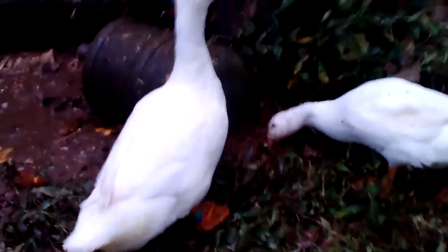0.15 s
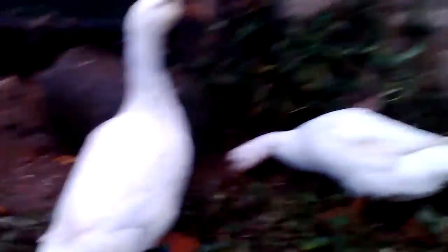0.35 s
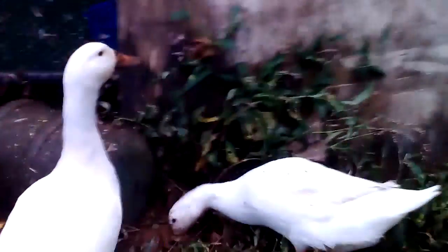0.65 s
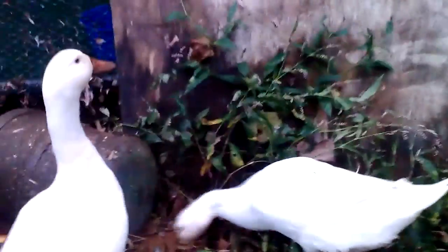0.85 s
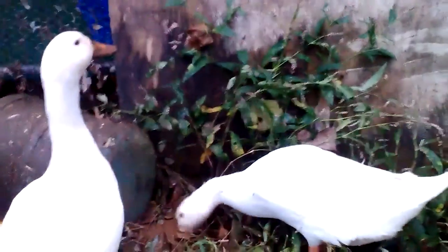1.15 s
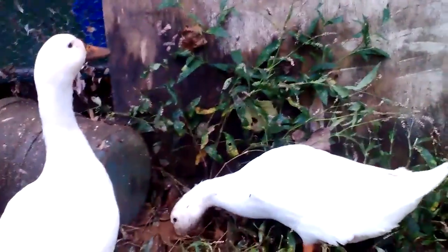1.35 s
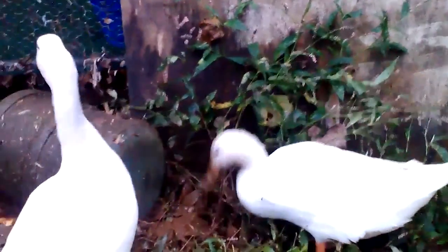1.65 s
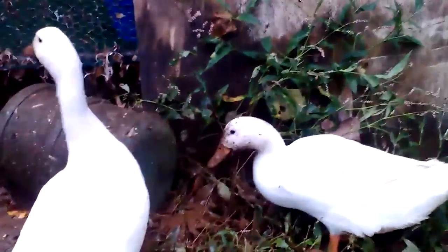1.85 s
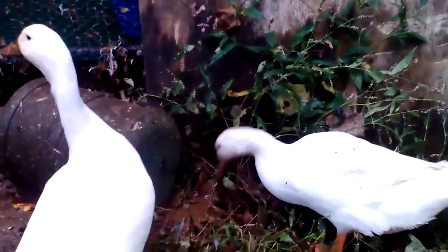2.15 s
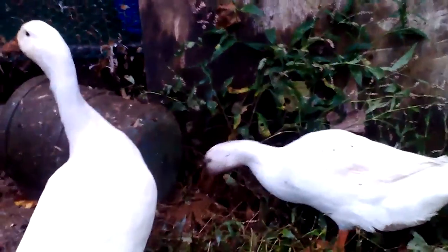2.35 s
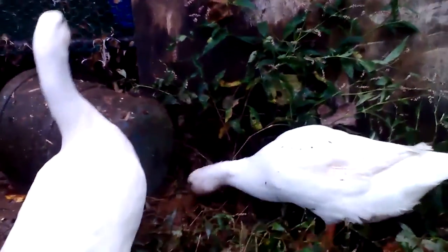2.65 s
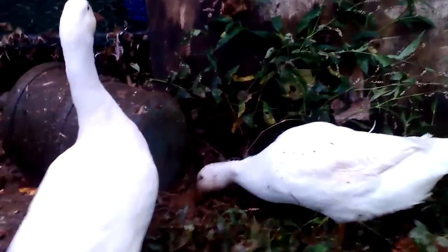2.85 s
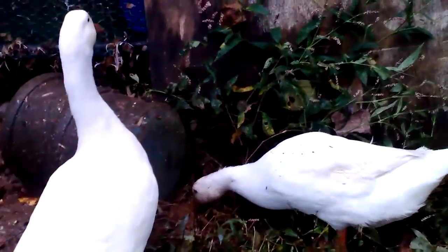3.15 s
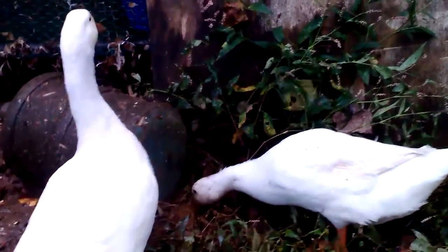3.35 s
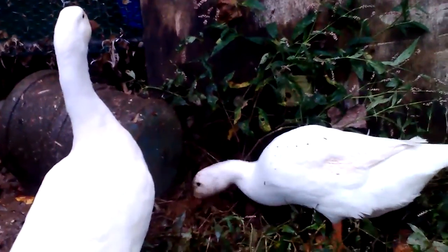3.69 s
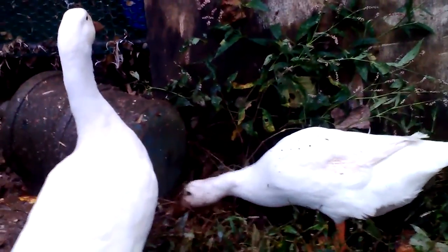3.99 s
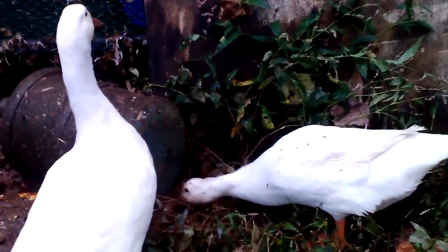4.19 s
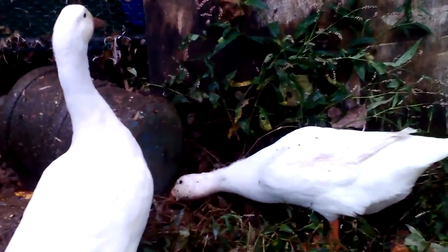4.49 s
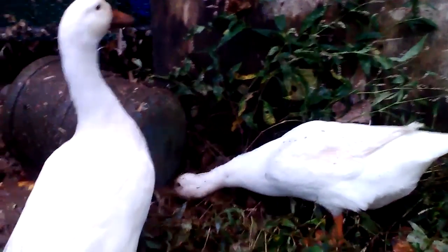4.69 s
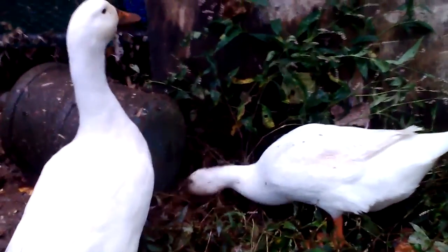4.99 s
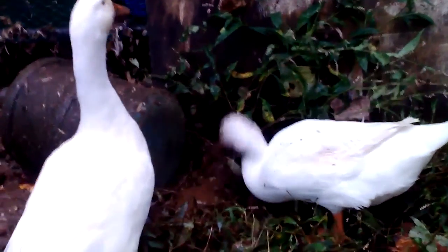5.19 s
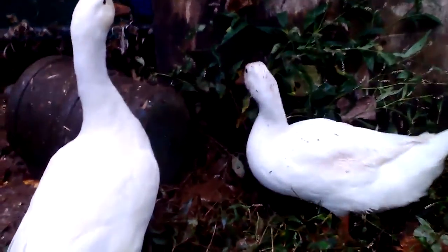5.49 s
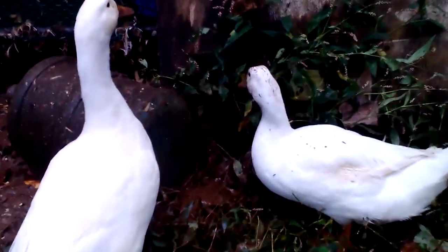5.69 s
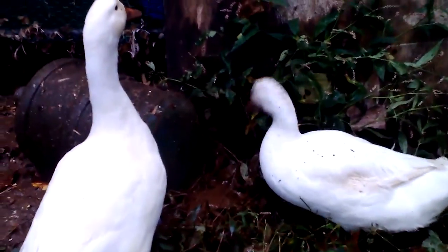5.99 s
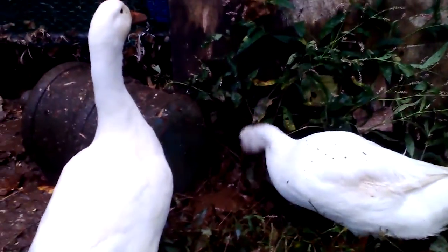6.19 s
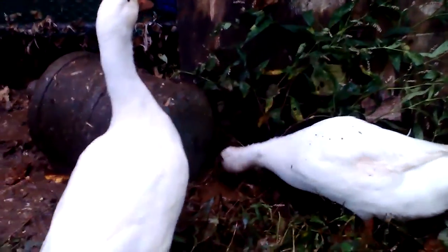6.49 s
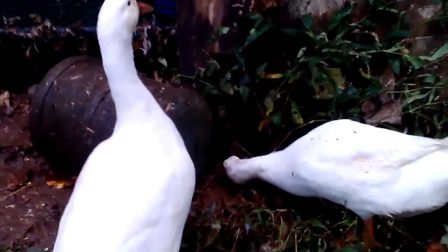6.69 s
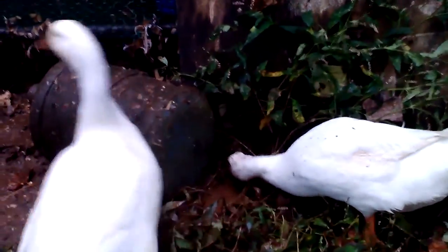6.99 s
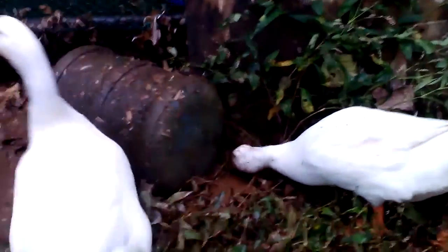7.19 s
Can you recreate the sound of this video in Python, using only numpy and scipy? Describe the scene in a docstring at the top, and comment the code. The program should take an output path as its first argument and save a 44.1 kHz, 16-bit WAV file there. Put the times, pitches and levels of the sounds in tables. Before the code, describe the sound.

Two domestic ducks are heard close up in a yard, in mono, over a steady hiss. Short, soft, high trilled clucks repeat throughout, about two or three a second, unevenly spaced. For the first 1.4 seconds one duck feeds, with tiny wet ticks and sharp crackles of stems and grit. The feeding returns from about 2.7 to 5 seconds, with a rapid squelching run of the bill in mud around 4.4 seconds and four quick bill claps just after. From 6.4 seconds the nibbling resumes, and between 6.7 and 7.3 seconds come four quick hoarse quacks, growing louder, with one sharp bill clap at 6.9 seconds and a last cluck. In the background a faint distant motor hums and changes speed, most noticeable around 1 second. A few faint falling whistles sound far off between 5 and 6.7 seconds. Nearby surfaces add a slight, short echo.

```python
"""Soft trilled clucks over a steady hiss: two domestic ducks in a yard, close up, in mono.
Each cluck is a train of swept peeps from the syrinx. One duck dabbles, its bill smacking in wet mud.
At the end one breaks into hoarse quacks, pulses and chopped air ringing the open throat.
A barrel and a wall answer them. Behind are a far motor that changes speed and a few faint whistles."""
import sys
import numpy as np
from scipy import signal
from scipy.fft import rfft, irfft, next_fast_len
from scipy.io import wavfile
from scipy.ndimage import map_coordinates

SR = 44100
rng = np.random.default_rng(int(sys.argv[2]) if len(sys.argv) > 2 else 0)


def persist_wave(psi):
    """Save psi, clipped to +-1, as 16-bit WAV."""
    counts = np.round(np.clip(psi, -1, 1) * 32767).astype(np.int16)
    wavfile.write(sys.argv[1], SR, np.atleast_2d(counts).T)


N = 323680


def amp(db):
    return 10 ** (np.asarray(db) / 20)


def unit_rms(x):
    return x / np.sqrt(np.mean(x ** 2) + 1e-20)


def clock(length_s):
    return np.arange(int(length_s * SR)) / SR


def sine(pitch_hz):
    return np.sin(2 * np.pi * np.cumsum(pitch_hz) / SR)


def curve_at(points, hz):
    """Interpolate (freq_hz, value) points on a log frequency axis."""
    freqs_hz, values = np.transpose(points)
    return np.interp(np.log(hz + 1), np.log(freqs_hz + 1), values)


def add(track, start_s, x):
    i = max(round(start_s * SR), 0)
    track[i:i + len(x)] += x[:max(len(track) - i, 0)]


def wobble(rate_hz, n):
    """Smooth random curve, rate_hz knots a second."""
    knots = rng.standard_normal(int(n * rate_hz / SR) + 4)
    return map_coordinates(knots, [np.arange(n) * rate_hz / SR])


def filtered(x, response):
    """Apply a complex frequency response."""
    size = next_fast_len(len(x) + SR // 10)
    return irfft(rfft(x, size) * response(np.fft.rfftfreq(size, 1 / SR)), size)[:len(x)]


def noise(spectrum, n):
    """Coloured noise, rms 1."""
    return unit_rms(filtered(rng.standard_normal(n), lambda f: amp(curve_at(spectrum, f))))


def resonance(f, centre_hz, width_hz):
    return 1j * f * width_hz / (centre_hz ** 2 - f ** 2 + 1j * f * width_hz)


def cavity(modes, f):
    """Response of parallel resonances, alternating in sign."""
    return sum((-1) ** k * amp(db) * resonance(f, hz, width_hz)
               for k, (hz, width_hz, db) in enumerate(modes))


def snap(centre_hz, spray_s, width_ratio, grit, order=2):
    """A contact and a brief spray of smaller ones through a broad resonance; peak 1."""
    t = clock(0.06)
    age = 2 * t / spray_s
    force = grit * rng.standard_normal(len(t)) ** 3 * np.sqrt(age) * np.exp(-age)
    force[0] += 1
    ring = filtered(force, lambda f: resonance(f, centre_hz, width_ratio * centre_hz) ** order)
    return ring / np.abs(ring).max()


# outdoor noise spectra: freq_hz, density_db
MURMUR_SPECTRUM = [(76, -30), (130, -2.5), (270, -5.5), (336, -4), (488, -9.5), (562, -0.5), (623, -5.5),
                   (690, -1), (1040, -1), (1250, -1), (2010, 1), (2190, -2.5), (2800, -8), (3640, -46.5),
                   (6160, -120)]
HISS_SPECTRUM = [(2000, -45), (2850, -6), (3200, -0.5), (3700, -0.5), (4500, -3.5), (5100, 2.5),
                 (5800, -0.5), (6500, 2), (7900, -10), (10000, -11)]
RUMBLE_SPECTRUM = [(20, -57), (35, -26), (50, -7.5), (78, 3), (110, 3.5), (160, -15), (300, -51.5)]
def background(murmur_db=-46, hiss_db=-38.5, rumble_db=-60):
    """Even hiss over the gently moving murmur and rumble of the outdoors."""
    murmur = amp(murmur_db + 0.6 * wobble(6, N)) * noise(MURMUR_SPECTRUM, N)
    hiss = amp(hiss_db) * noise(HISS_SPECTRUM, N)
    rumble = amp(rumble_db + 1.7 * wobble(6.1, N)) * noise(RUMBLE_SPECTRUM, N)
    return murmur + hiss + rumble


# engine hum: time_s, pitch_hz, level_db
MOTOR_HUM = [(0, 133, -61), (.55, 130, -62), (0.8, 122, -50), (0.999, 112, -49), (1.42, 93, -56),
             (2.2, 98, -54), (2.8, 105, -55), (3.55, 106, -64.5), (4, 80, -62), (5.1, 83, -61.5),
             (5.5, 86, -56), (7.34, 88, -62.5)]
def motor():
    """The low hum of a far engine slows and picks up again."""
    time_s, pitch_hz, level_db = np.transpose(MOTOR_HUM)
    t = np.arange(N) / SR
    hum = sine(np.interp(t, time_s, pitch_hz) * (1 + 0.01 * wobble(11, N)))
    return amp(np.interp(t, time_s, level_db) + 1.6 * wobble(14, N)) * unit_rms(hum)


# far notes: start_s, length_s, start_hz, level_db
WHISTLE_NOTES = [(5.108, 0.14, 1080, -49), (6.03, 0.085, 1000, -53), (6.232, 0.049, 1084, -40.5),
                 (6.594, 0.072, 815, -43.5)]
def whistles(fall_ratio=0.8):
    """Faint falling notes from far off."""
    out = np.zeros(N)
    for start_s, length_s, start_hz, level_db in WHISTLE_NOTES:
        n = int(length_s * SR)
        pitch_hz = np.geomspace(start_hz, fall_ratio * start_hz, n) * (1 + 0.04 * wobble(160, n))
        envelope = np.hanning(n) ** 0.5 * amp(4.2 * wobble(70, n))
        add(out, start_s, amp(level_db) * unit_rms(envelope * sine(pitch_hz)))
    return out


def far_echo(x, gain_db=-21, t60_s=0.44):
    """A faint tail from across the yard."""
    t = clock(0.6)
    tail = rng.standard_normal(len(t)) * amp(-60 * t / t60_s)
    return amp(gain_db) * signal.fftconvolve(x, tail / np.linalg.norm(tail))[:N]


# barrel and wall decay: freq_hz, t60_s
NEAR_DECAY = [(200, 0.11), (1500, 0.061), (8000, 0.036)]
def near_echoes(x, blocks=28, delay_s=0.002058):
    """Barrel and wall answer differently as the birds move their heads: a new random tail per block."""
    out = np.zeros(N)
    edges = np.linspace(0, N, blocks + 1).astype(int)
    for i, j in zip(edges, edges[1:]):
        hz, t, spectra = signal.stft(rng.standard_normal(SR // 4), SR, nperseg=256)
        decay = amp(-60 * t / curve_at(NEAR_DECAY, hz)[:, None])
        _, tail = signal.istft(spectra * decay, SR, nperseg=256)
        add(out, i / SR + delay_s, signal.fftconvolve(x[i:j], tail / np.linalg.norm(tail)))
    return out


def reflection_comb(f, copies=3, gain=0.26):
    """Ground and barrel send back close copies, which comb each cluck in its own way."""
    delays_s = rng.uniform(0.0015, 0.009, (copies, 1))
    return 1 + gain * np.exp(-2j * np.pi * delays_s * f).sum(0)


# bill on the ground: start_s, end_s
FEEDING_SPANS = [(0, 1.4), (2.7, 5), (6.4, 7.34)]
def nibbles(tick_db=-46, grit_db=-42, spread_db=7, tries=170):
    """Tiny wet ticks and grit at random while the bill is on the ground."""
    out = np.zeros(N)
    for position, size, colour in rng.random((tries, 3)):
        time_s = position * N / SR
        if any(start_s < time_s < end_s for start_s, end_s in FEEDING_SPANS):
            tick = amp(tick_db) * snap(550 * 3 ** colour, spray_s=0.0066, width_ratio=1.1, grit=0.32)
            grit = amp(grit_db) * snap(3400 * 1.71 ** colour, spray_s=0.0043, width_ratio=0.26, grit=0.22)
            add(out, time_s, amp(spread_db * (size + 0.5)) * (tick + grit))
    return out


# stems and grit: start_s, peak_db, centre_hz
STEM_CRACKLES = [(0.2848, -24.5, 4300), (0.4878, -19.5, 4250), (0.591, -20, 3740), (0.6605, -19.5, 5360),
                 (0.7822, -18.5, 5240), (1.1029, -18.5, 5300), (1.1116, -22.5, 3730), (1.1761, -16.5, 4070),
                 (1.3826, -12.5, 4930), (3.048, -24, 5070), (3.208, -22, 4000), (3.3838, -21.5, 5200),
                 (3.5126, -23, 4000), (4.422, -14.5, 5300)]
def crackles():
    """Wet stems and grit crackle."""
    out = np.zeros(N)
    for start_s, peak_db, centre_hz in STEM_CRACKLES:
        crack = snap(centre_hz, spray_s=0.005, width_ratio=0.14, grit=0.4, order=1)
        add(out, start_s, amp(peak_db) * crack)
    return out


# bill claps: start_s, peak_db, centre_hz
BILL_CLAPS = [(0.541, -25.5, 1290), (2.641, -27.5, 1360), (3.127, -27, 1340), (3.206, -26, 1840),
              (4.719, -18, 1500), (4.784, -16, 1410), (4.858, -15.5, 1410), (4.913, -20.5, 1210),
              (6.321, -32.5, 328), (6.56, -31, 338), (6.739, -22.5, 1630), (6.896, -8.5, 1510),
              (7.157, -20, 1300)]
def bill_claps():
    """Single claps of the bill."""
    out = np.zeros(N)
    for start_s, peak_db, centre_hz in BILL_CLAPS:
        add(out, start_s, amp(peak_db) * snap(centre_hz, spray_s=0.0032, width_ratio=0.65, grit=0.055))
    return out


def mud_stroke(colour, opening, squelch_db=6, opening_db=-8.5, thud_db=-10):
    """The bill smacks, sprays mud (less when opening) and thuds on soft ground."""
    smack = snap(1480 * np.exp(0.16 * colour), spray_s=0.0053, width_ratio=0.82, grit=0.13)
    squelch = snap(4850, spray_s=0.0071, width_ratio=0.27, grit=0.35, order=1)
    thud = snap(280, spray_s=0.0045, width_ratio=1.3, grit=0.15, order=1)
    return smack + amp(squelch_db + opening_db * opening) * squelch + amp(thud_db) * thud


# bill chattering in mud: start_s, end_s, level_db
DABBLE_RUNS = [(0.411, 0.6, -34.5), (2.89, 3.1, -33.5), (4.358, 4.7, -23.5)]
def dabbling(first_gap_s=0.032, slowing_s=0.0011, tiring_db=0.23, scatter_db=1, suck_s=0.01, suck_db=-6.5):
    """The bill shuts and opens by turns, slowing and softening; the mud lets go after each stroke."""
    out = np.zeros(N)
    for start_s, end_s, level_db in DABBLE_RUNS:
        for k, draws in enumerate(rng.standard_normal((12, 2, 3))):
            stroke_s = start_s + k * first_gap_s + slowing_s * k * (k - 1) / 2
            for suck, (size, colour, lag) in enumerate(draws):  # suck: 0 stroke, 1 release
                gain = (stroke_s < end_s) * amp(level_db - tiring_db * k + suck_db * suck + scatter_db * size)
                delay_s = suck * suck_s * np.exp(0.25 * lag)
                add(out, stroke_s + delay_s, gain * mud_stroke(colour, opening=k % 2))
    return out


# throat modes, bill open: centre_hz, width_hz, gain_db
THROAT_MODES = [(228, 160, -17.5), (425, 100, -16), (617, 35, -6.5), (804, 98, -7.5), (1020, 100, -8),
                (1278, 120, 0.5), (1660, 126, 0), (2017, 39, -1), (2270, 110, -8), (3330, 1100, -19),
                (5230, 860, -21)]
def open_throat(f, notch_hz=2700, notch_width_hz=500):
    """Throat resonances with one notch."""
    return cavity(THROAT_MODES, f) * (1 - resonance(f, notch_hz, notch_width_hz))


# hoarse quacks: crest_s, level_db
QUACK_CALLS = [(6.738, -27.5), (6.878, -23.5), (7.028, -20), (7.194, -22)]
def quacks(top_hz=224.7, droop=0.11, jitter=0.017, scatter_db=3.5, edge_db=17, low_hz=1150, open_db=7):
    """Uneven pulses and air chopped at the same rate ring the throat; pitch arches with the effort."""
    out = np.zeros(N)
    loudest_db = max(row[1] for row in QUACK_CALLS)
    for crest_s, level_db in QUACK_CALLS:
        # a softer quack is lower, hoarser and shorter
        softer_db = loudest_db - level_db
        crest_hz = top_hz - 5 * softer_db
        air_share = min(0.46 + 0.04 * softer_db, 1)
        rise_s, fall_s = np.array([0.039, 0.052]) * np.exp(-0.06 * softer_db)
        t = clock(2 * (rise_s + fall_s)) - 2 * rise_s
        off_crest = np.where(t < 0, t / rise_s, t / fall_s) ** 2
        pitch_hz = crest_hz * (1 - droop * np.minimum(off_crest, 2)) * (1 + jitter * wobble(250, len(t)))
        cycles = np.cumsum(pitch_hz) / SR
        pulses = np.diff(np.floor(cycles), prepend=0) * amp(scatter_db * wobble(196, len(t)))
        air = rng.standard_normal(len(t)) * np.exp(-1.5 * (cycles % 1))
        source = np.sqrt(1 - air_share) * unit_rms(pulses) + np.sqrt(air_share) * unit_rms(air)
        voice = unit_rms(filtered(source, open_throat))
        # the low resonances fade as the bill opens
        lows = filtered(voice, lambda f: 1 / (1 + (f / low_hz) ** 8))
        voice = voice - lows + lows * amp(-open_db * t / (rise_s + fall_s))
        add(out, crest_s - 2 * rise_s, amp(level_db - edge_db * off_crest ** 1.03) * voice)
    return out


def trill(t, pitch_hz, rate_hz=94, slowing_hz_per_s=389.4, arch=0.211, waver=0.082, edge_db=14):
    """The syrinx makes a slowing train of upward-swept peeps that swells and rises in the middle."""
    n = len(t)
    off_centre = np.linspace(-1, 1, n) ** 2
    peep_count = rate_hz * t - slowing_hz_per_s * t ** 2 / 2
    peep_phase = (peep_count - 0.673 + 0.035 * wobble(66.2, n)) % 1
    sweep_hz = pitch_hz * (0.71 + 0.7 * peep_phase)
    bend = (1 + arch * (0.25 - off_centre)) * (1 + waver * wobble(700.9, n))
    accent = np.exp(-((peep_phase - 0.24) / 0.13) ** 2)  # strongest early in the sweep
    peeps = (0.17 + accent) * np.sin(np.pi * peep_phase) ** 0.2
    swell = amp(-edge_db * off_centre) * signal.windows.tukey(n, 0.15)
    tone = swell * peeps * sine(sweep_hz * bend) * amp(1.4 * wobble(153, n))
    return tone, swell, peeps


# throat modes, bill nearly shut: centre_hz, width_hz, gain_db
GULLET_MODES = [(1161, 135, 0.5), (1571, 116, -1), (1880, 101, 6.5), (2403, 123, 5)]
# cluck overtones: freq_hz, density_db
RASP_SPECTRUM = [(1500, -46), (3000, -6.5), (3600, -3), (4200, -4.5), (4800, -1), (6300, -7.5), (8000, -32)]
# soft clucks: start_s, level_db, pitch_hz, length_s
CLUCK_CALLS = [(0.188, -31.5, 1662, 0.081), (0.679, -27, 1698, 0.079), (0.936, -26, 1828, 0.086),
               (1.501, -31, 1655, 0.08), (1.753, -27, 1718, .083), (2.023, -27, 1737, 0.081),
               (2.682, -31.5, 1520, 0.071), (2.951, -29, 1643, 0.076), (3.4, -35, 1470, 0.074),
               (3.918, -29.5, 1494, 0.08), (4.184, -29, 1578, 0.079), (4.727, -30.5, 1650, 0.072),
               (4.968, -26.5, 1706, 0.0837), (5.23, -28, 1715, 0.093), (5.598, -28, 1660, 0.088),
               (5.849, -27.5, 1700, .09), (6.285, -29.5, 1640, 0.083), (6.526, -27.5, 1745, 0.098),
               (7.236, -26, 1816, 0.093)]
def clucks(rasp_db=-39, rasp_db_per_db=2.63, pop_db=-29):
    """The airway pops open and a trill rings the gullet; its rasp grows faster than the voice."""
    out = np.zeros(N)
    loudest_db = max(row[1] for row in CLUCK_CALLS)
    for start_s, level_db, pitch_hz, length_s in CLUCK_CALLS:
        tone, swell, peeps = trill(clock(length_s), pitch_hz)
        neck_stretch = 1 + 0.015 * rng.standard_normal()  # shifts the resonances
        voice = filtered(tone, lambda f: cavity(GULLET_MODES, f * neck_stretch) * reflection_comb(f))
        rasp = swell ** 2 * np.sqrt(peeps) * noise(RASP_SPECTRUM, len(tone))
        rasp_gain = amp(rasp_db + rasp_db_per_db * (level_db - loudest_db))
        add(out, start_s, amp(level_db) * unit_rms(voice) + rasp_gain * unit_rms(rasp))
        add(out, start_s, amp(pop_db) * snap(770, spray_s=0.0046, width_ratio=1.0, grit=0.035))
    return out


def scene(voice_echo_db=-10, bill_echo_db=-12):
    """The ducks in their yard, the same in both channels."""
    voices = clucks() + quacks()
    bills = bill_claps() + crackles() + dabbling() + nibbles()
    echoes = near_echoes(amp(voice_echo_db) * voices + amp(bill_echo_db) * bills) + far_echo(voices)
    mono = voices + bills + echoes + motor() + whistles() + background()
    return np.array([mono, mono])


# microphone response: freq_hz, gain_db
MIC_RESPONSE = [(22, -15.5), (42, 1.5), (6700, 0), (7150, -2.5), (7900, -14.5), (8700, -10.5), (9300, -9),
                (9900, -24.5)]
def record(dry, cutoff_hz=10045):
    """The microphone dulls the deep bass and high treble and passes nothing above the cutoff."""
    return np.array([filtered(x, lambda f: amp(curve_at(MIC_RESPONSE, f)) * (f < cutoff_hz)) for x in dry])


dry = scene()
out = record(dry)
persist_wave(out)
```